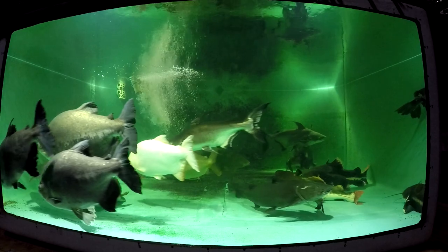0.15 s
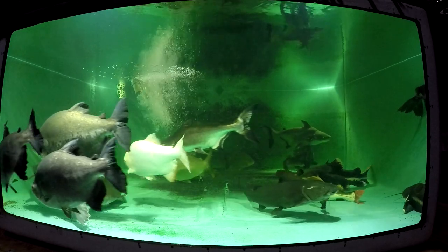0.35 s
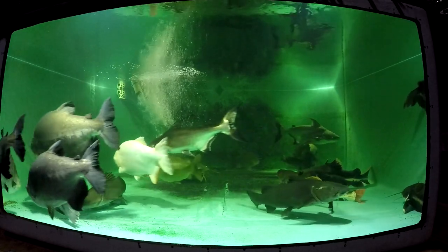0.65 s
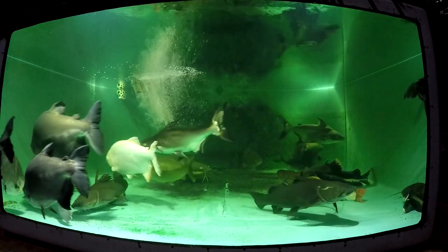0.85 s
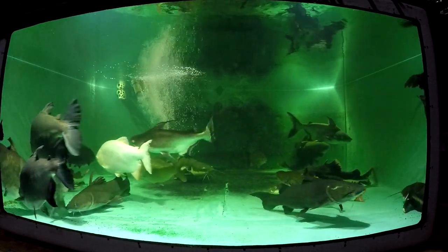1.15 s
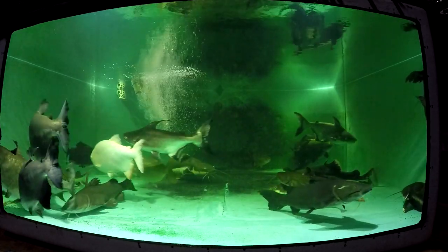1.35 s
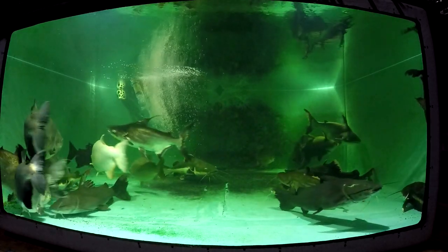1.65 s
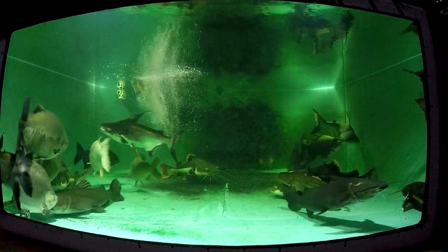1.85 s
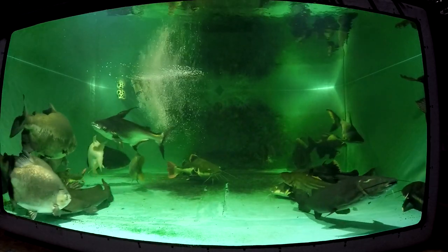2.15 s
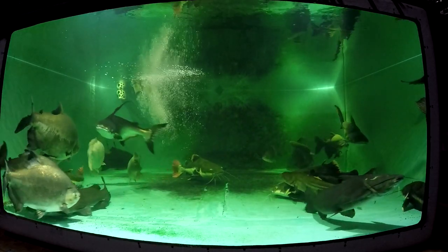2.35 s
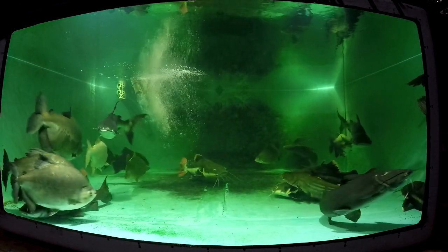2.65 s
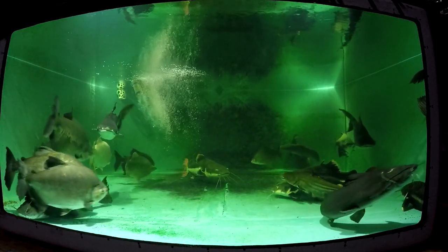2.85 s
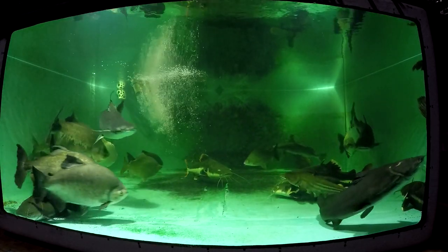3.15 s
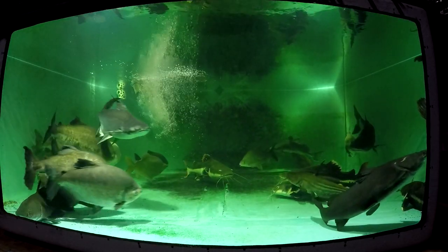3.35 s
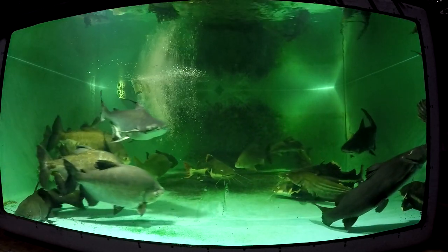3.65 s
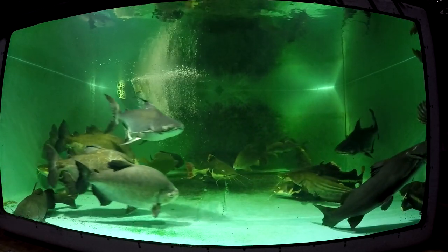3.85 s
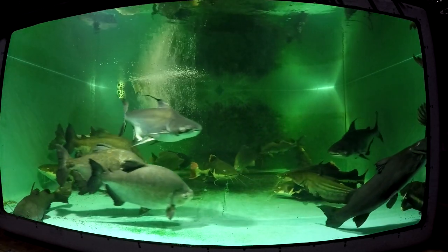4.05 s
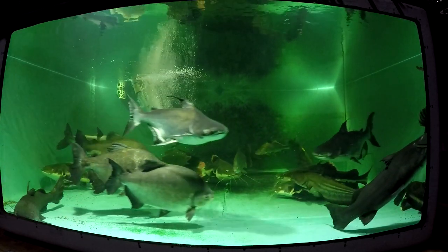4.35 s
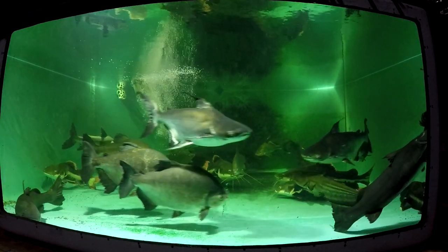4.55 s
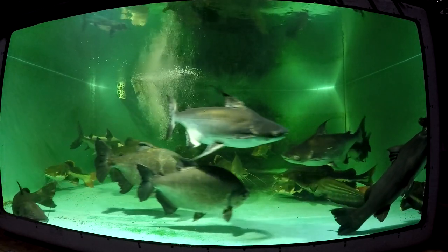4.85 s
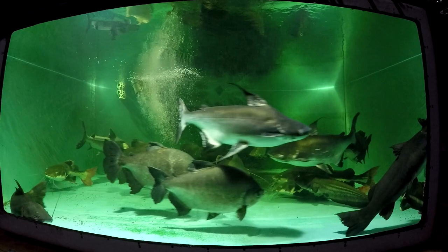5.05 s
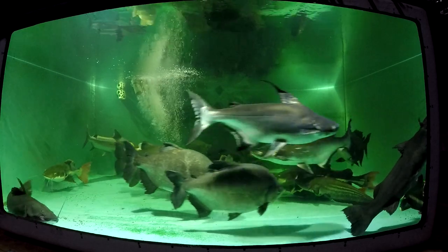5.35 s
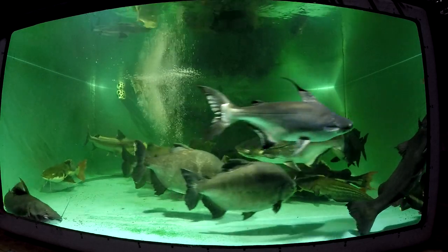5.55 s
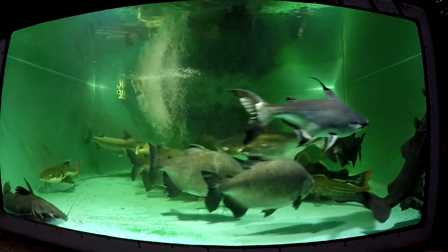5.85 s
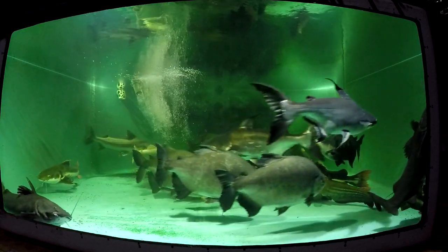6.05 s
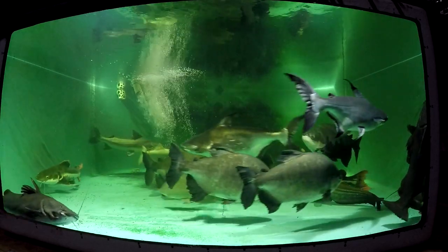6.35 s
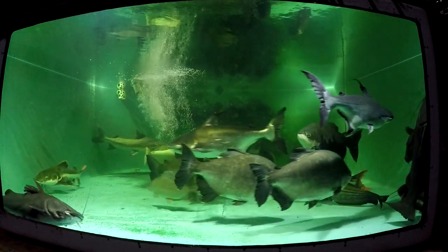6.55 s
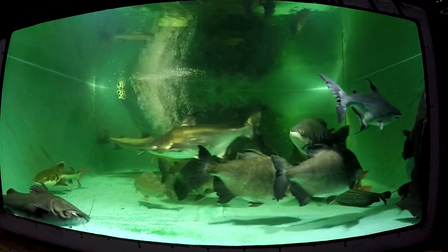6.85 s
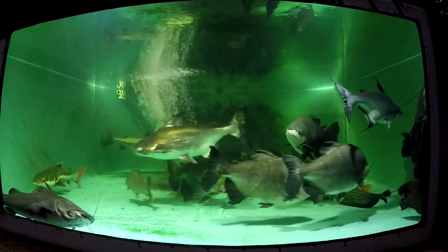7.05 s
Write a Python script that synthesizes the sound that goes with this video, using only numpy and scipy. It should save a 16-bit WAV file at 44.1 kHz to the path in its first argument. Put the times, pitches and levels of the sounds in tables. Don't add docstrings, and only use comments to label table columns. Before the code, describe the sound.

A continuous bass drone from slightly mismatched aquarium pumps dominates, throbbing as flow surges ring the room and front pane. Quiet water rush and fine, wide bubble fizz stay steady behind it. One small sharp splash comes near the middle of the first half, then several weaker ticks cluster after four and a half seconds. Indoor, near the tank, with compressed bass and soft highs.

```python
import sys
import numpy as np
from scipy import signal
from scipy.fft import rfft, irfft, next_fast_len
from scipy.io import wavfile
from scipy.ndimage import uniform_filter1d, map_coordinates

SR = 44100
rng = np.random.default_rng(int(sys.argv[2]) if len(sys.argv) > 2 else 0)


def dump_mix(stems):
    frames = np.atleast_2d(stems).T
    limited = np.clip(frames, -1, 1)
    pcm = np.round(limited * 32767).astype(np.int16)
    wavfile.write(sys.argv[1], SR, pcm)


def boost(x):
    u = np.asarray(x, float) / 20
    return 10 ** u


N = 317961

# speed in Hz, shaft angle at the start in turns.
SHAFT_HZ_TURNS = [(56.718, .261), (57.047, -.454), (57.273, -.04), (59.164, -.392)]
UNBALANCE_DB = [-18.7, -22.5, -18, -16.7]
# pitch in Hz, level in dB, phase unsteadiness in turns.
MOTOR_TONES = [(119.5, -45, 0.053), (371.2, -57.5, .6), (476.5, -65, .3), (908, -63, .8), (978, -60.5, .3),
               (973, -61, 0.042)]
# start in seconds, peak level in dB.
ROOM_SURGES = [(-0.0398, -12.8), (0.3396, -17.1), (0.6822, -14.3), (0.9047, -23.1), (1.5262, -17.6),
               (1.7563, -17.6), (1.9247, -16.3), (1.9959, -18.9), (2.1715, -18.3), (2.822, -18.7),
               (2.987, -18.5), (3.208, -14.7), (3.3556, -18.3), (3.7697, -18.0), (3.9547, -22.4),
               (4.1131, -20.9), (4.2447, -15.6), (4.4337, -17.1), (4.6327, -15.1), (4.7317, -14.0),
               (4.9225, -21.0), (5.1272, -21.3), (5.3689, -12.8), (5.4523, -20.0), (5.5642, -16.7),
               (5.6874, -16.6), (5.9397, -21.7), (6.1731, -21.1), (6.6155, -23.6), (6.7566, -20.6)]
# start in seconds, peak level in dB.
PANE_SURGES = [(-0.0344, -19.7), (0.1055, -23.3), (0.4283, -19.9), (0.7812, -22.4), (1.3367, -22.4),
               (1.563, -24.4), (1.999, -26.1), (2.3284, -21.4), (2.8273, -21.9), (3.0037, -24.0),
               (3.171, -22.6), (3.4583, -28.2), (3.6124, -21.1), (4.2933, -19.5), (4.6812, -23.9),
               (4.8506, -22.0), (5.2526, -21.2), (5.9937, -23.6), (6.3954, -18.4), (6.7699, -23.2)]
# start in seconds, peak level in dB, T60 in seconds, pan (left minus right) in dB,
# bright mist level in dB.
DROPS = [
    (1.16, -40, .25, -2, -10),
    (2.838, -30.5, 0.38, -1, -7),
    (4.51, -41, 0.31, -6, -20),
    (5.12, -38, .19, -1.5, -22),
    (5.301, -33.5, 0.3, 4, -20),
    (5.65, -39, .25, 1, -14),
    (6.0, -37, .25, -1, -18),
    (6.762, -48, .25, 2, -20),
]
# frequency in Hz, level in dB per Hz.
SPRAY_SPECTRUM = [(2000, -61), (3500, -11.5), (4500, -12), (6200, -3.5), (7500, -10), (9000, -24),
                  (12000, -79.5)]
# frequency in Hz, level in dB per Hz.
MIST_SPECTRUM = [(2000, -60), (3800, -4), (7700, 0), (9000, -5), (11200, -9), (12300, -24), (13500, -28),
                 (14500, -80)]
# frequency in Hz, level in dB per Hz.
RUMBLE_SPECTRUM = [(15, -13), (27, 1), (36, -10), (62, 5), (76, 3.5), (86, 3.5), (99, -5), (142, -17.5),
                   (163, -4.5), (243, -12), (260, -19.5), (280, -16.5), (330, -24.5), (500, -64.5)]
# frequency in Hz, level in dB per Hz.
RUSH_SPECTRUM = [(120, -29.5), (200, -2.5), (329, -12), (367, -9), (467, -8.5), (527, -11), (868, -12),
                 (993, -11.5), (1120, -12), (1700, -15), (2320, -19.5), (5000, -33.5), (6500, -58.5),
                 (11000, -120)]
# frequency in Hz, level in dB per Hz.
FIZZ_SPECTRUM = [(2060, -15), (3500, -3), (3810, -7), (4910, -4.5), (6260, 1), (7470, -5.5), (8280, -10.5),
                 (9930, -15), (13600, -32.5), (14900, -34)]
# frequency in Hz, left-right correlation.
PORT_LIKENESS = [(60, 0.89), (130, 0.99), (290, 0.86), (630, 0.39), (1380, 0.17), (3000, 0.5), (6600, 0.1),
                 (14400, 0.087)]
# frequency in Hz, lead of the left in radians.
PORT_LEAD = [(30, -.3), (120, -.1), (300, -.14), (600, -.55), (850, -.4), (1210, 1.3), (2150, 1.0),
             (2500, 2.1), (2930, .3), (4650, .2), (5770, -3.2), (10200, -3.1), (14600, -6.2)]
# frequency in Hz, left minus right in dB.
PORT_TILT = [(60, -0.5), (110, -2), (200, -1), (370, 0.5), (690, -2.5), (1260, -3.5), (2320, -0.5),
             (4270, -1.0), (7860, -1), (14400, -4)]


def pumps():
    t = np.arange(N) / SR
    hum = np.zeros(N)
    for (hz, turns), db in zip(SHAFT_HZ_TURNS, UNBALANCE_DB):
        hum += boost(db) * np.cos(2 * np.pi * (hz * t + turns))
    whine = np.zeros(N)
    for hz, db, drift_turns in MOTOR_TONES:
        level = boost(db + 3.5 * wobble(3))
        whine += level * np.cos(2 * np.pi * (hz * t + drift_turns * wobble(2.5)))
    return np.sqrt(2) * (hum + whine)


def boom():
    room = resonance(ROOM_SURGES, pitch_hz=67.74, swell_s=.0684)
    pane = resonance(PANE_SURGES, pitch_hz=60.003, swell_s=.0647)
    return room + pane


def resonance(surges, pitch_hz, swell_s):
    start_s, db = np.transpose(surges)
    pushes = np.bincount(np.round((start_s + 1) * SR).astype(int), boost(db), N + SR)
    age = np.arange(SR) / SR
    envelope = age / swell_s * np.exp(1 - age / swell_s)
    ring = envelope * np.sin(2 * np.pi * pitch_hz * age)
    return signal.fftconvolve(pushes, ring)[SR:][:N]


def splashes():
    rise_s, mist_t60_ratio = .003, .7
    t = np.arange(N) / SR
    spray, mist = np.zeros((2, N)), np.zeros((2, N))
    for start_s, db, t60_s, pan_db, mist_db in DROPS:
        age = np.clip(t - start_s, 0, 1)
        port_db = db - 8.0 + np.array([[.5], [-.5]]) * pan_db
        onset = boost(port_db) * (1 - np.exp(-age / rise_s))
        spray += onset * boost(-60 * age / t60_s)
        mist += onset * boost(mist_db + 7.5 - 60 * age / (mist_t60_ratio * t60_s))
    spray *= spread(rng.standard_normal((2, N)), SPRAY_SPECTRUM)
    mist *= spread(rng.standard_normal((2, N)), MIST_SPECTRUM)
    return spray + mist


def chirp():
    start_s, length_s, t60_s, level_db = 2.848, .1, 0.18, -42
    pitch_hz, sink_hz_per_s = 6600, 26000
    age = np.clip(np.arange(N) / SR - start_s, 0, length_s)
    turns = pitch_hz * age - sink_hz_per_s * age ** 2 / 2 + .1 * wobble(400)
    arch = np.sqrt(np.maximum(np.sin(np.pi * age / length_s), 0))
    fade = arch * boost(-60 * age / t60_s + 4 * wobble(250))
    return boost(level_db) * fade * np.sin(2 * np.pi * turns)


def water():
    rush_db = -37 - 0.06 * np.arange(N) / SR
    rumble = boost(-31.0 + 0.87 * wobble(3)) * spread(patchy(depth_db=-0.3), RUMBLE_SPECTRUM)
    rush = boost(rush_db + 0.28 * wobble(5.5)) * spread(patchy(depth_db=0.4), RUSH_SPECTRUM)
    bursts = boost(3.2 * rng.standard_normal((2, N)))
    fizz = boost(-47.5 + .4 * wobble(14)) * spread(patchy(depth_db=1.0) * bursts, FIZZ_SPECTRUM)
    return rumble + rush + fizz


def patchy(depth_db):
    z = signal.stft(rng.standard_normal((2, N)), nperseg=512)[2]
    field = rng.standard_normal(z.shape[1:])
    field = uniform_filter1d(field, size=14, axis=1)
    field = uniform_filter1d(field, size=6, axis=0)
    return signal.istft(z * boost(depth_db * unit(field)), nperseg=512)[1][:, :N]


def spread(pair, spectrum):
    half = np.array([[.5], [-.5]])

    def mid_side(hz):
        angle = np.arccos(np.clip(along(PORT_LIKENESS, hz), -1, 1)) / 2
        return boost(along(spectrum, hz)) * [np.cos(angle), np.sin(angle)]

    def ports(hz):
        return boost(half * along(PORT_TILT, hz)) * np.exp(1j * half * along(PORT_LEAD, hz))

    mid, side = filtered(pair, mid_side)
    return unit(filtered(np.array([mid + side, mid - side]), ports))


def filtered(x, response):
    m = next_fast_len(N + SR // 2)
    return irfft(rfft(x, m) * response(np.fft.rfftfreq(m, 1 / SR)), m)[..., :N]


def along(points, hz):
    f, v = np.transpose(points)
    return np.interp(np.log(hz + 1), np.log(f + 1), v)


def wobble(rate_hz):
    knots = rng.standard_normal(int(N * rate_hz / SR) + 4)
    return map_coordinates(knots, [np.arange(N) * rate_hz / SR])


def unit(x):
    return x / np.sqrt(np.mean(x ** 2) + 1e-20)


def scene():
    skew = np.array([[1], [-1]])

    def hum_ports(hz):
        return boost(-.4 * skew) * np.exp(-1j * skew * 0.061 * (hz < 200))

    hum = filtered(pumps() + boom(), hum_ports)
    return hum + water() + splashes() + chirp()


def low_pass(x):
    return signal.sosfilt(signal.butter(12, 15050, fs=SR, output="sos"), x)


def record(dry):
    split_hz, top, knee = 160, .486, 3.3
    bass = filtered(dry, lambda hz: 1 / (1 + (hz / split_hz) ** 4))
    swell = np.abs(signal.hilbert(bass.mean(axis=0), next_fast_len(N))[:N])
    swell = uniform_filter1d(swell, size=700)
    squeeze = (1 + (swell / top) ** knee) ** (-1 / knee)
    return low_pass(dry - bass + bass * squeeze)


dry = scene()
out = record(dry)
dump_mix(out)
```